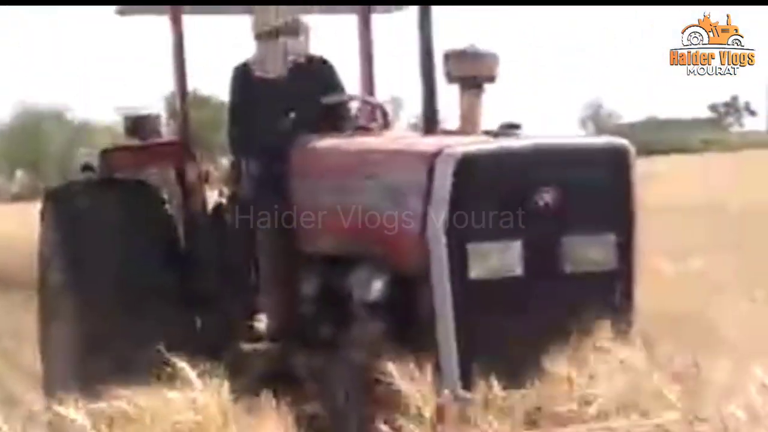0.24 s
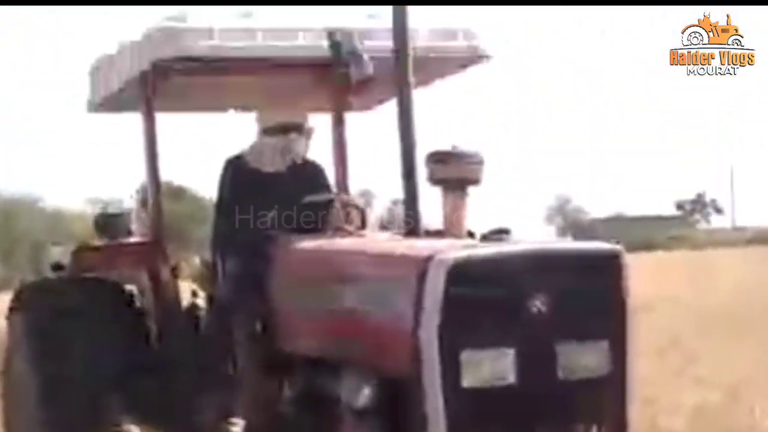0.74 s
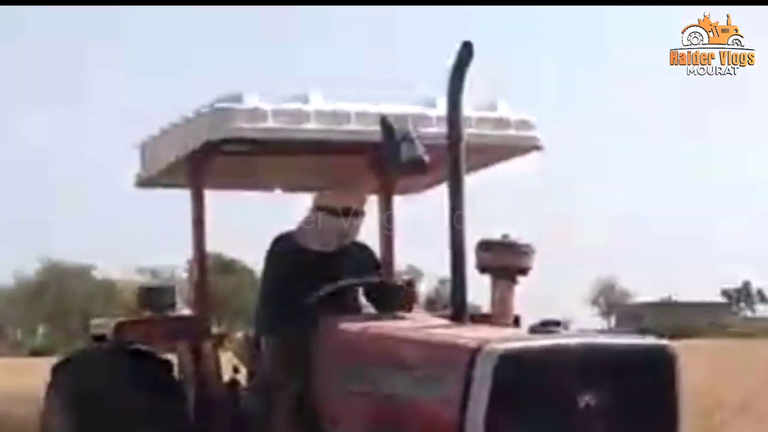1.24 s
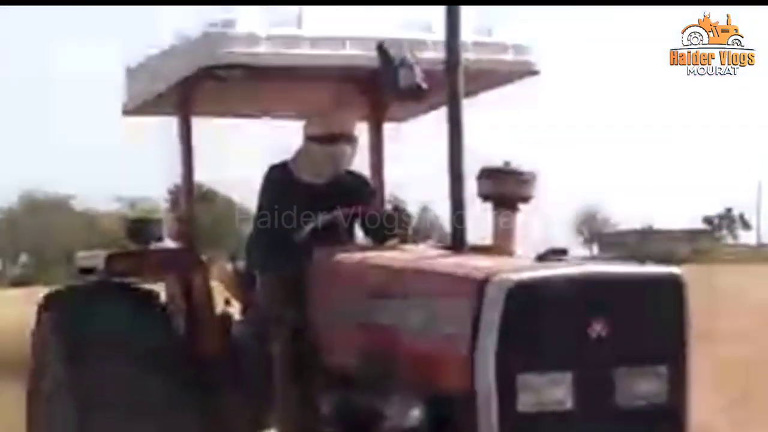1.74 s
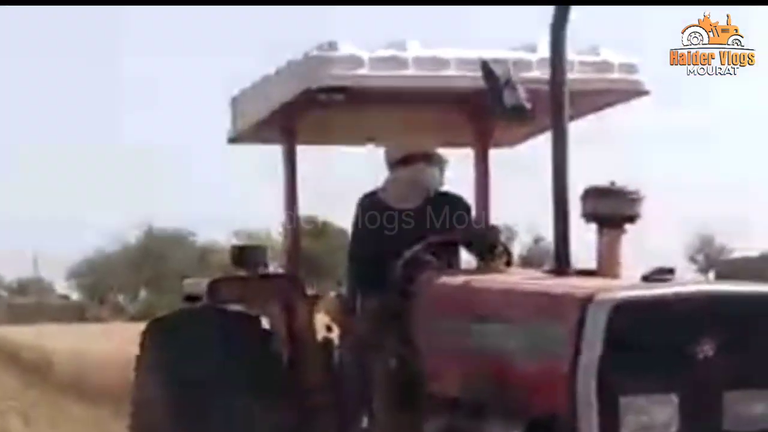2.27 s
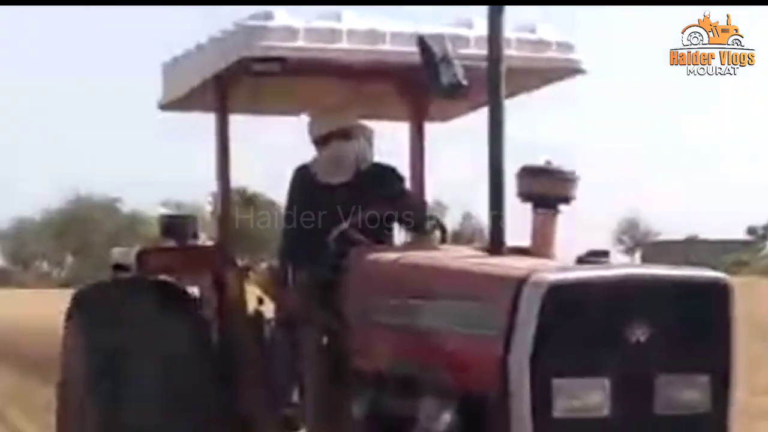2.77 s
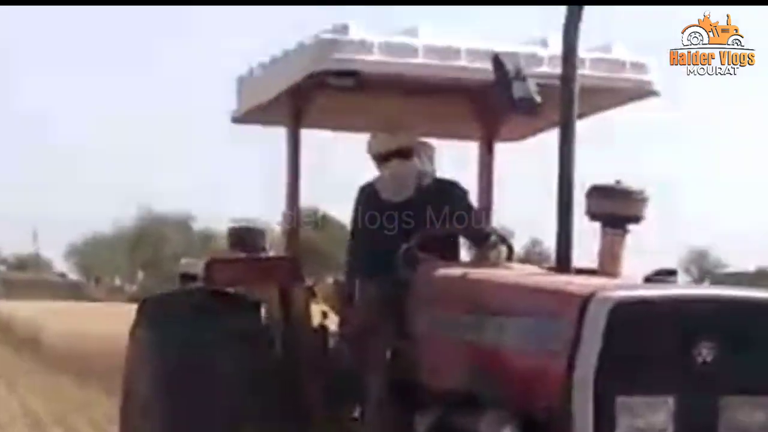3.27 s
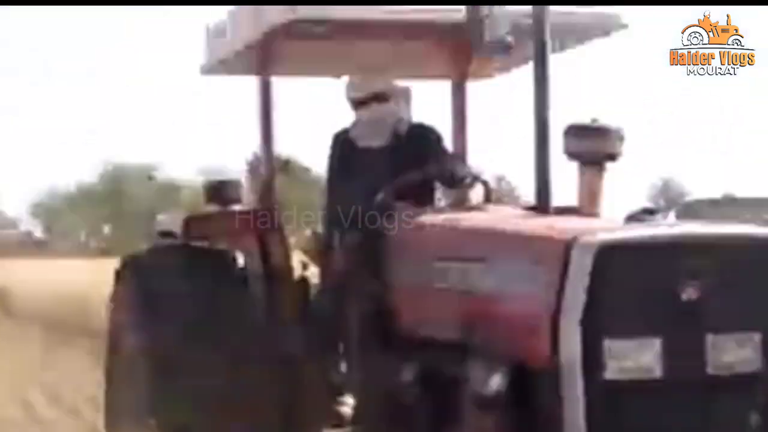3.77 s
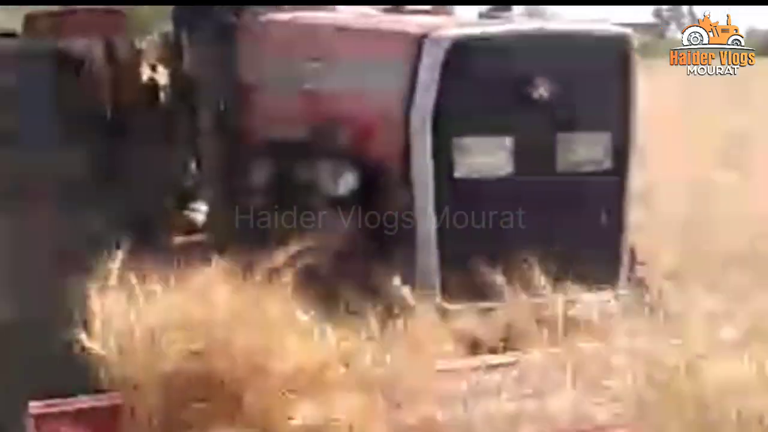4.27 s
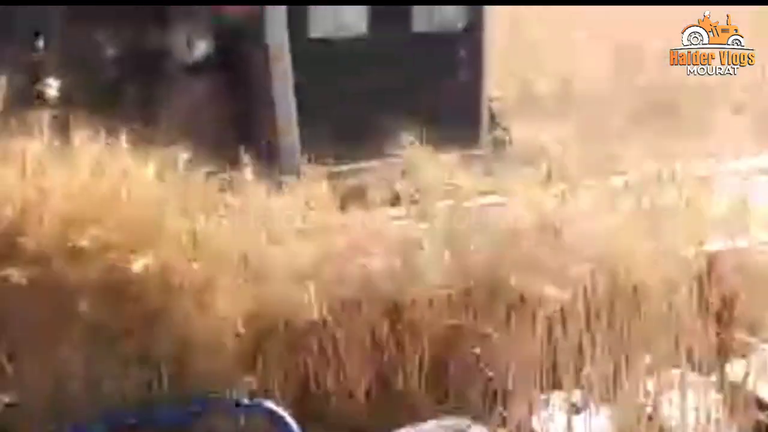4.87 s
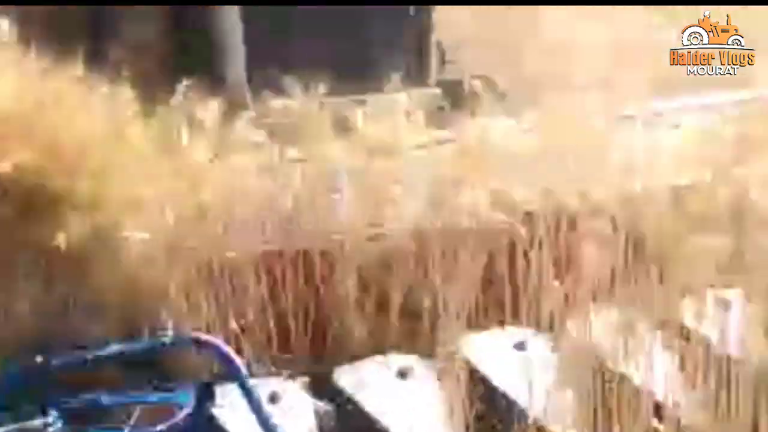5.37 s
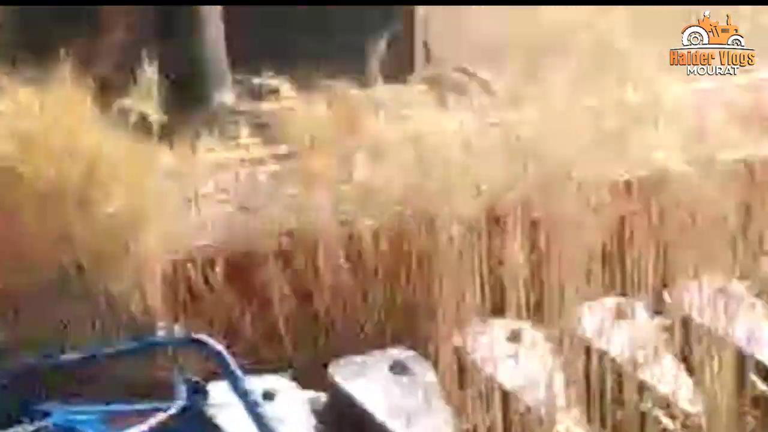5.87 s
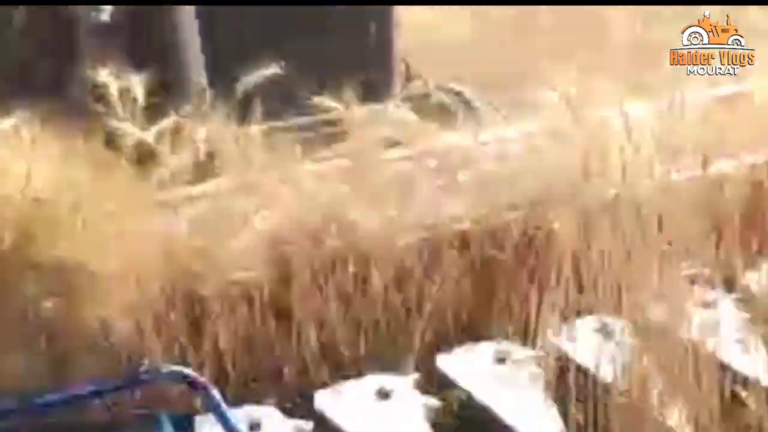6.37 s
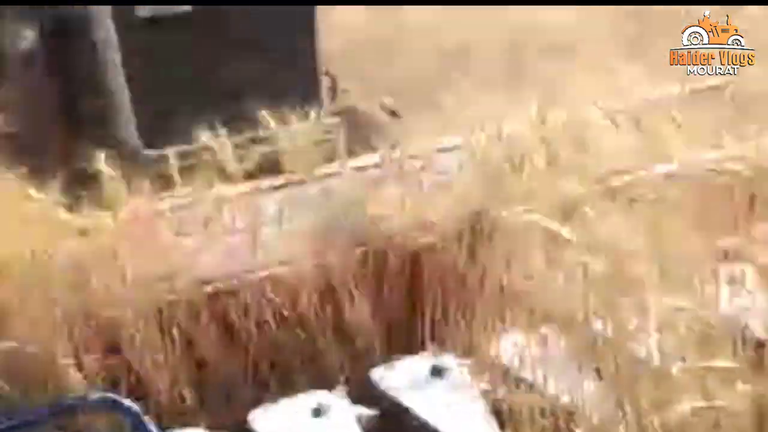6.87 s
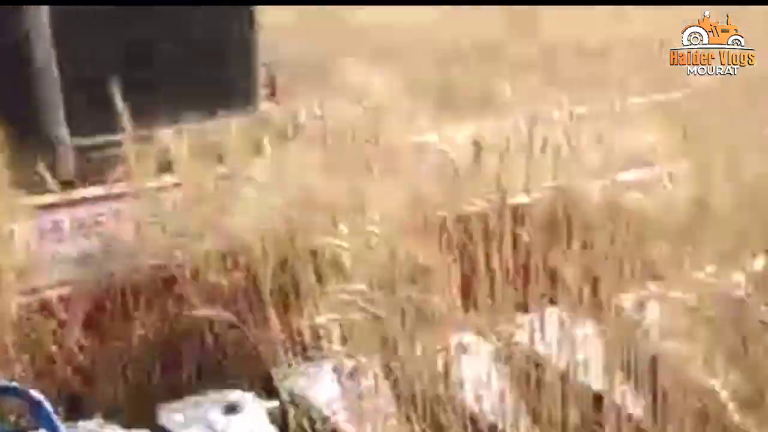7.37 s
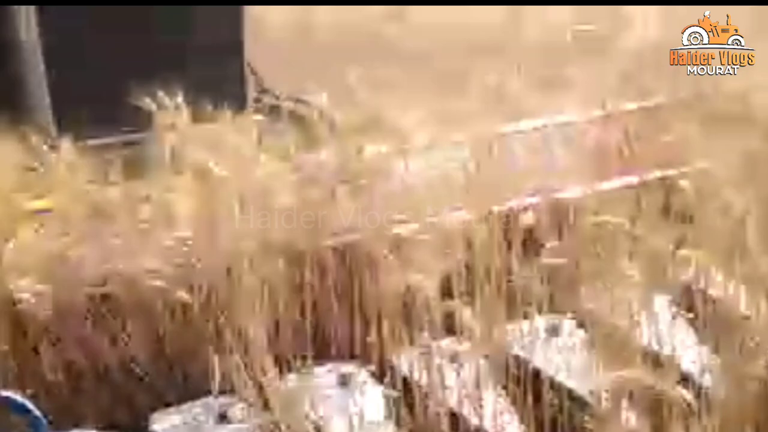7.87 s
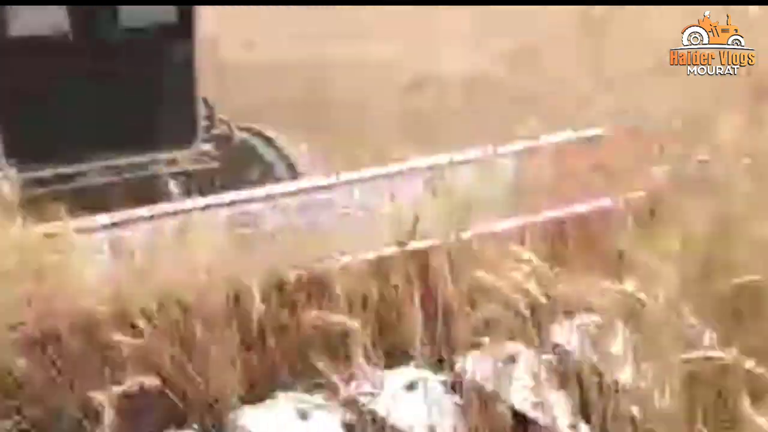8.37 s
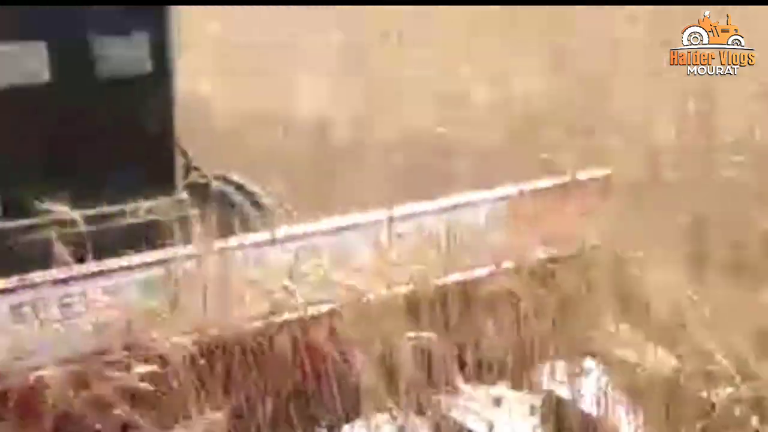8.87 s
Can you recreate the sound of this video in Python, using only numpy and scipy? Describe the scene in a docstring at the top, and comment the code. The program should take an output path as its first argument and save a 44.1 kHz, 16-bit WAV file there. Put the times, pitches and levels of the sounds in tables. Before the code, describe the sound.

Loose chains, guards and frame chatter steadily beside a diesel engine while a reciprocating blade shears crisp straw, growing closer and louder over the engine.

```python
"""Straw crackles and steel rattles a few steps away as a diesel tractor pushes a reaper through standing wheat.
A crank throws the knife to and fro: it knocks at its reversals and shears straw in between.
Random impacts and noise ring through resonances for chains, guards, frame and exhaust; sines make the clinks.
The engine's clatter fades as the hand-held mono phone nears the cutter bar; its noise suppression flickers."""
import sys
import numpy as np
from scipy import signal
from scipy.fft import rfft, irfft
from scipy.io import wavfile
from scipy.ndimage import uniform_filter1d

SR = 44100
rng = np.random.default_rng(int(sys.argv[2]) if len(sys.argv) > 2 else 0)


def inscribe(sig):
    """Save sig as 16-bit PCM at rate SR to the path in sys.argv[1].

    A 1-D sig is mono; a 2-D sig holds one channel per row.
    Samples are clipped to [-1, 1] before scaling.
    """
    pcm = np.round(np.clip(np.atleast_2d(sig).T, -1, 1) * 32767)
    wavfile.write(sys.argv[1], SR, pcm.astype(np.int16))


N = 401751  # length in samples

# Low rumble spectrum. Each row: frequency in Hz, level in dB per Hz.
RUMBLE = [(20, -26), (45, -14), (65, -5), (100, 2.5), (160, 3), (230, 3), (290, -16), (500, -16),
          (1000, -25)]
# Exhaust and silencer resonances. Each row: centre in Hz, width in Hz, level in dB.
EXHAUST = [(375, 53, -9), (447.5, 97, 1), (510, 148, 1), (565.6, 70, 0.5), (633, 53, -6)]
# The exhaust note swells or sinks. Each row: middle in seconds, length in seconds, change in dB.
EXHAUST_SWELLS = [(.08, .25, -3), (1.42, 0.18, 3), (2.85, .25, 2), (3.6, 0.45, -1), (4.87, 0.058, -7),
                  (5.8, 0.059, -5.5), (7.55, 0.27, -2.5), (8.5, 0.071, -4.5), (8.85, 0.078, -4)]
# A hollow drone above the exhaust, in patches. Each row: middle in seconds, length in seconds, rms level in dB.
DRONES = [(2.03, .25, -36.5), (2.77, .3, -34.5), (4.35, .25, -40), (5.45, 0.11, -45), (5.7, 0.13, -39),
          (6.0, .1, -44), (7.27, .13, -39.5), (7.5, 0.17, -38.5), (7.8, 0.35, -43), (8.13, 0.18, -42)]
# Engine firing tone. Each row: multiple of the firing rate, rms level in dB.
FIRING = [(1, -64.5), (2, -68)]
FIRING_HZ = 45.57  # mean firing rate
# Engine block spectrum. Each row: frequency in Hz, level in dB per Hz.
BLOCK = [(220, -35), (340, -5), (600, -10.5), (720, -0.5), (900, 4.5), (1300, 3.5), (1550, 2.5), (2100, 2),
         (2600, -8), (3500, 8.5), (3950, -3.5), (4400, -25), (6000, -15.5), (12000, -47)]
# The engine's clatter comes through more clearly. Each row: middle in seconds, length in seconds, change in dB.
CLEARINGS = [(2.2, 2.2, 2), (4.45, 0.77, 2.5), (8.14, 0.23, 11), (8.41, 0.078, 11.5), (8.95, 0.33, 9)]

# Soft low bumps on the phone. Each row: time in seconds (10 ms after onset), peak in dB, pitch in Hz.
BUMPS = [(0.049, -35, 196), (0.3, -36.5, 231), (.48, -40, 235), (0.753, -36.5, 244), (0.959, -35, 198),
         (1.297, -28.5, 174), (1.335, -36, 200), (2.149, -32, 231), (5.836, -31.5, 150),
         (6.989, -38.5, 214), (7.62, -42, 169), (8.135, -40, 182)]

# Dry ears of wheat, spectrum. Each row: frequency in Hz, level in dB per Hz.
EARS = [(6000, -30), (10000, 8), (12500, 2), (14000, -3.5), (16000, -9)]
# The hiss of the ears swells or sinks. Each row: middle in seconds, length in seconds, change in dB.
RUSTLES = [(1.58, 0.18, 5), (2.27, .2, -1), (3.4, 0.41, -10), (5.74, 0.1, 7), (6.1, 0.11, 0),
           (6.75, .6, 2.5), (8.35, 0.2, 6)]
# Snapping straw spectrum. Each row: frequency in Hz, level in dB per Hz.
STRAW = [(2000, -20), (4000, -31), (5400, -4.5), (5900, 3), (6600, 2), (7800, 4), (9000, 2), (10300, -4.5),
         (11200, -9.5), (11600, -23.5), (12500, -48), (14500, -22)]
# The knife's two passes through the straw.
# Each row: start in the turn from 0 to 1, dying length in turns, relative level in dB.
CUTS = [(.215, 0.032, 3), (.715, 0.064, -1.5)]
# Stalks squeaking along the guides. Each row: middle in seconds, length in seconds, level in dB.
SQUEAKS = [(1.67, 0.051, -24), (2.6, 0.07, -35), (4.87, 0.11, -32), (5.2, 0.055, -31), (5.33, 0.07, -27),
           (7.07, 0.072, -40), (7.36, 0.047, -36), (7.64, 0.25, -34), (7.78, 0.08, -33), (8.48, 0.1, -31)]
# Thick tufts going through the knife. Each row: middle in seconds, length in seconds, level in dB.
TUFTS = [(5.2, 0.063, -37), (6.19, .05, -31), (5.49, 0.09, -27), (5.82, 0.12, -24.5), (6.43, 0.067, -26.5),
         (7.07, 0.069, -27.5), (7.46, 0.09, -39), (7.59, 0.072, -35), (7.75, 0.11, -27), (8.27, 0.048, -33),
         (8.39, 0.06, -26.5), (8.47, 0.056, -23), (8.89, 0.076, -28.5)]
# Breaking tuft spectrum. Each row: frequency in Hz, level in dB per Hz.
TUFT = [(600, -32), (1400, -16), (1700, -1.5), (2400, 4), (3200, 6.5), (3900, 0), (4400, -26), (4900, 5),
        (5400, -12), (5900, -25), (7500, -38), (12000, -44)]
# Stiff stalks crunching between knife and guard.
# Each row: start in seconds, level in dB before trim, dying time in seconds.
CRUNCHES = [(.064, -19, .012), (.357, -14.5, .014), (.506, -20, .009), (.523, -16, .022), (.585, -14, .014),
            (.645, -16, .014), (.769, -17, .009), (.788, -15.5, .02), (1.23, -21, .011), (2.403, -20, .008),
            (2.69, -18.5, .009), (3.274, -22, 0.016), (3.851, -23, .011), (4.585, -17, .012),
            (5.015, -18, .01), (5.109, -20, .012), (5.176, -20, .011), (5.349, -26, .01),
            (5.957, -22, .012), (6.04, -24, .009), (6.101, -17, .012), (6.415, -16, .011),
            (6.478, -18, .014), (6.535, -16.5, .01), (6.683, -18, .008), (7.052, -17.5, .011),
            (7.287, -20, 0.01), (7.34, -19, .024), (7.483, -18.5, .018), (7.552, -20, 0.011),
            (7.775, -23, .018), (8.284, -22, 0.025), (9.017, -21, .009), (9.091, -23, .012)]
# Crunch spectrum. Each row: frequency in Hz, level in dB per Hz.
CRUNCH = [(1200, -32), (2800, -11), (3500, 5.5), (4000, 1.5), (4400, -4), (4900, -2), (5400, -4.5),
          (5900, -23), (7200, -10), (12000, -45)]

# Loose steel parts, struck and ringing. Each row: start in seconds, level in dB before trim, pitch in Hz.
CLINKS = [(.342, -18, 3420), (.984, -13, 2130), (3.195, -16, 1820), (3.414, -14, 3140), (4.285, -21, 3230),
          (4.369, -17, 3220), (4.873, -15, 3120), (5.176, -16, 3430), (5.446, -13, 3400),
          (5.739, -16, 3250), (6.031, -17, 3230), (6.187, -17, 2500), (6.323, -16, 3210),
          (7.449, -15.5, 1750), (7.775, -15, 3170), (8.347, -16, 3230), (8.415, -21, 1650),
          (8.837, -12.5, 2800), (8.876, -17, 2490)]
# The hardest clanks of knife drive and binder.
# Each row: start in seconds, level in dB before trim, relative brightness in dB.
CLANKS = [(0.3541, -16, -8), (0.523, -20, -2), (1.4481, -15, -18), (1.9609, -18, -8), (2.1735, -18, -15),
          (2.4039, -18, -1), (3.4136, -13.5, -7), (4.58, -20, -16), (5.014, -19, -16), (5.4455, -16, -18),
          (5.8052, -19, -11), (6.0302, -21, -19), (6.3225, -15.5, -15), (6.469, -19, -12),
          (7.054, -20, -10), (7.3397, -21.5, -12), (7.5517, -21, -8), (7.7742, -19.5, -13),
          (8.8363, -14.5, -19)]
# Steel frame of the reaper. Each row: centre in Hz, width in Hz, level in dB.
FRAME = [(871, 118, -7.5), (1104, 155, -6.5), (1312, 118, -7), (1637, 460, -3.5), (1978, 240, -6),
         (2230, 400, -2), (2438, 142, -1.5), (2827, 560, 0.5), (3167, 310, 3.5), (3452, 260, 1.5),
         (3702, 310, -2)]
# The frame shakes harder or eases. Each row: middle in seconds, length in seconds, change in dB.
SHUDDERS = [(3.5, 1, 1.5), (4.88, 0.57, 0.5), (5.47, 0.16, 1), (7.96, 0.044, -2.5), (8.7, 0.24, -0.5)]
# Knife guards and fingers. Each row: centre in Hz, width in Hz, level in dB.
GUARDS = [(4190, 190, -3.5), (4694, 500, 1), (4960, 770, -2.5), (5426, 240, -2), (6370, 100, -9.5),
          (6890, 310, -11), (7630, 420, -10), (9000, 160, -35), (9600, 200, -43), (10820, 890, -12),
          (11990, 400, -17)]
# Knife scraping in its guards, spectrum. Each row: frequency in Hz, level in dB per Hz.
SCRAPE = [(1500, -30), (3000, -13), (4000, 6), (4700, -3), (5400, -1.5), (6200, -18), (8000, -7.5),
          (12000, -31)]
# Knife crank speed. Each row: time in seconds, turns per second in Hz.
CRANK = [(0.0, 6.847), (1.5, 6.852), (3.0, 6.893), (4.5, 6.881), (6.0, 6.867), (7.5, 6.893), (9.11, 6.839)]
# Knocks and lingering rattles in each crank turn.
# Each row: mean place in the turn from 0 to 1, mean level in dB, dying time in seconds.
STROKE = [(0.425, 2, 0.017), (0.6, -3, 0.021), (0.9, 1, 0.01), (0.05, -2.5, 0.012)]
# The knife is loud with the phone pointing down at it, faint with the phone pointing up at the cab.
# Each row: time in seconds, level of the knife in dB.
KNIFE = [(0, -25), (0.55, -27.5), (1.2, -30), (1.5, -29), (2.25, -38), (2.7, -33), (3.0, -34.5),
         (3.35, -30), (3.7, -29.5), (4.03, -37), (4.42, -33), (4.65, -26.5), (6.2, -28), (6.9, -27),
         (7.5, -25.5), (8.0, -25), (8.35, -22.5), (8.7, -29.5), (9.11, -27)]
KNIFE_FULL_DB = -24.5  # KNIFE level with the phone pointing at the knife
GUARD_DB = -26.5  # ring of the guards with the phone pointing at them
# change in dB per dB of the knife; the ears' hiss rises as the phone is held up
GUARD_PER_AIM, FRAME_PER_AIM, CHAFF_PER_AIM = 0.91, 0.14, -0.4
# share of plain scraping at first, when it stops falling in seconds, and the share left to the end
SCRAPE_SHARE, SCRAPE_ENDS_S, SCRAPE_LEFT = 0.7, 2.3, 0.0059

# Steady fades as the phone nears the cutter bar, before passing swells and aim.
# Each holds: level at first in dB, start of the fade in seconds, slope in dB per second.
EXHAUST_FADE = (-30, 2.8, -0.36)
CLATTER_FADE = (-24.5, 2.6, -2.1)
FRAME_FADE = (-19, 5.25, -0.44)
STRAW_FADE = (-29, 3.83, -2.7)
CHAFF_FADE = (-41.5, 1.7, -0.35)
# Bands that the phone's noise suppression thins, leaving a hollow, wavering tone.
# Each row: mean centre in Hz, width setting in Hz, depth in dB before wavering, start in seconds, end in seconds.
# A band fades in ahead of its start and out after its end.
HOLLOWS = [(338, 127, -7, 6.9, 8.5), (735, 150, -3, 2.7, 15), (740, 154, -2, 8.8, 10),
           (1190, 96, -2, 2.9, 6.6), (1460, 164, -9.5, 7.5, 9.8), (1507, 220, -3, 5.1, 3.6),
           (990, 90, -2.5, 6, 9.6), (2435, 190, -6, 3.9, 8.3), (3060, 96, -3, 3, 9.2),
           (4160, 160, -3, 2.4, 10), (4430, 170, -7.5, 3.4, 10), (5070, 130, -11, 2.4, 4.2),
           (5546, 210, -8.5, 3.5, 10), (6030, 440, -10, 4.8, 10), (5930, 440, -5, 4.2, 3.5),
           (6200, 310, -3, 10.2, 17), (9030, 900, -9, 7.1, 8.6)]
TOP_HZ = 15750  # the phone passes sound up to here


def undb(db):
    """Decibels to gain."""
    return 10 ** (np.asarray(db) / 20)


def unit(x):
    """Scale to rms 1."""
    return x / np.sqrt(np.mean(x ** 2))


def steady(x, window_s):
    """Even out the strength of a sound over a short time; rms near 1."""
    power = np.abs(uniform_filter1d(x * x, int(window_s * SR) + 1))
    return x / np.sqrt(power + 1e-12)


def curves(table):
    """Draw each column of a timed table as a curve, one value a sample."""
    s, *columns = np.transpose(table)
    return [np.interp(np.arange(N) / SR, s, column) for column in columns]


def fade(level_db, from_s, db_per_s):
    """A level in dB that holds, then changes steadily."""
    return level_db + db_per_s * np.maximum(np.arange(N) / SR - from_s, 0)


def swells(table):
    """Smooth passing rises and dips in dB; a length is measured at half height."""
    t = np.arange(N) / SR
    return sum(db * .5 ** ((2 * (t - s) / length) ** 2) for s, length, db in table)


def bursts(table):
    """Gain of short rounded bursts; a length is measured at half power."""
    t = np.arange(N) / SR
    power = 0
    for s, length, db in table:
        away = np.minimum((2 * (t - s) / length) ** 2, 20)
        power = power + undb(db) ** 2 * np.exp2(-away)
    return np.sqrt(power)


def walk(rate):
    """Random wander with a new target `rate` times a second, slewed between targets; rms 1."""
    hold = int(SR / rate)
    steps = rng.standard_normal(4096)[np.arange(N) // hold % 4096]
    return unit(uniform_filter1d(steps, hold))


def causal(x, gain, size=4096):
    """Filter with the fastest-dying (minimum-phase) response for a given gain curve."""
    hz = np.maximum(np.fft.rfftfreq(size, 1 / SR), 1)
    cepstrum = irfft(np.log(gain(hz) + 1e-6))
    # folding the cepstrum forward in time makes the response minimum-phase
    cepstrum[1:size // 2] *= 2
    cepstrum[size // 2 + 1:] = 0
    response = irfft(np.exp(rfft(cepstrum)))
    return signal.oaconvolve(x, response / np.linalg.norm(response))[:N]


def colour(x, spectrum):
    """Shape a sound by (Hz, dB) points, keeping the power of white noise."""
    hz, db = np.transpose(spectrum)
    return causal(x, lambda f: undb(np.interp(np.log(f), np.log(hz), db)))


def ring(x, modes):
    """Ring a body of steep (Hz, width, dB) resonances, keeping the power of white noise."""
    def gain(f):
        power = 0
        for hz, width, db in modes:
            detune = (f * f - hz * hz) / (f * width)
            power = power + (undb(db) / (1 + detune ** 2)) ** 2
        return np.sqrt(power)

    return causal(x, gain)


def contacts(rate, spread_db):
    """Dense tiny impacts of uneven size, `rate` a second on average; rms 1."""
    hit = rng.random(N) < rate / SR
    sign = np.sign(rng.standard_normal(N))
    size = undb(spread_db * np.clip(rng.standard_normal(N), -2, 2))
    return unit(hit * sign * size)


def blows(times, gains, decay):
    """Power of the chatter after blows: each starts at once and dies away."""
    power, age = np.zeros(N), np.arange(SR // 8) / SR
    for s, gain in zip(times, gains):
        start = int(np.clip(s * SR, 0, N - 1))
        power[start:start + len(age)] += (gain * np.exp(-age[:N - start] / decay)) ** 2
    return power


def low_rumble(rumble_db=-54):
    """Low-pitched noise rumbles under the engine, its level wandering slowly."""
    return undb(rumble_db) * colour(rng.standard_normal(N), RUMBLE) * undb(1.04 * walk(6))


def engine(exhaust_db, clatter_db, puff_depth=0.33, knock_db=6, knock_turns=.2, even_s=0.158, lump_db=1.0):
    """Each firing puffs gas through the silencer and knocks the block; a hollow drone comes and goes."""
    cycle = np.cumsum(FIRING_HZ * (1 + 0.004 * walk(2.985))) / SR
    pulse = np.cos(2 * np.pi * cycle) * 0.26 + np.cos(4 * np.pi * cycle) * 0.52
    gas = unit(rng.standard_normal(N) * (1 + puff_depth * pulse))
    exhaust = steady(ring(gas, EXHAUST), even_s) * undb(exhaust_db + lump_db * walk(30))
    drone = ring(gas, [(750, 50, 0)]) * bursts(DRONES)

    # each knock starts at a firing and dies over a part of the cycle
    knock = np.sqrt(1 + undb(knock_db) ** 2 * np.exp(-(cycle % 1) / knock_turns))
    clatter = unit(contacts(rate=5000, spread_db=2.0) * knock)
    block = colour(clatter, BLOCK) * undb(clatter_db)
    tone = sum(undb(db) * np.sqrt(2) * np.sin(2 * np.pi * round(k) * cycle) for k, db in FIRING)
    return exhaust + drone + block + tone


def bumps(decay_s=0.025, width_hz=90):
    """Dull low bumps: dying noise rings one low resonance for a few uneven cycles each."""
    push, out = rng.standard_normal(N), 0
    for s, db, hz in BUMPS:
        bump = ring(push * np.sqrt(blows([s - .01], [1], decay_s)), [(hz, width_hz, 0)])
        out = out + undb(db) * bump / np.abs(bump).max()
    return out


def wheat(turns, straw_db, chaff_db, cut_db=3.0, bite_s=0.0046, patchy_db=1.0, swell_db=1.2, sway_db=2.5):
    """Stalks snap in two bursts a turn as the knife passes, over the rustle of the swept, swaying ears."""
    cutting = 0
    for place, length, db in CUTS:
        since = (turns - place) % 1
        cutting = cutting + undb(db + cut_db) ** 2 * np.exp(-since / length)
    cutting = uniform_filter1d(cutting, int(bite_s * SR) + 1)
    # the crop stands unevenly, so some strokes bite more stalks than others
    stand = undb(1.6 * walk(12))
    unevenness = undb(patchy_db * walk(40) + swell_db * walk(3.4))
    flow = unit(np.sqrt(1 + cutting * stand) * unevenness)
    stalks = colour(contacts(rate=10000, spread_db=3.5) * flow, STRAW) * undb(straw_db)
    chaff = colour(rng.standard_normal(N) * flow, EARS) * undb(chaff_db + sway_db * walk(8.2))
    return stalks + chaff


def squeaks(squeak_hz=4230, width_hz=230, slip_db=4.5, slip_rate=60):
    """Dry stalks stick and slip along the steel guides with a thin, stuttering rasp."""
    slips = contacts(rate=2300, spread_db=8.5) * undb(slip_db * walk(slip_rate))
    return ring(unit(slips), [(squeak_hz, width_hz, 0)]) * bursts(SQUEAKS)


def tufts(clump_db=14.0, clump_rate=60, clump_s=0.0098):
    """A thick tuft meets the knife and breaks in sudden, coarse clumps of loud snaps."""
    when, size = rng.random((int(clump_rate * N / SR), 2)).T
    clumps = np.sqrt(1 + blows(when * N / SR, undb(clump_db * size), clump_s))
    snaps = unit(contacts(rate=1400, spread_db=4.5) * clumps)
    return colour(snaps, TUFT) * bursts(TUFTS)


def crunches(crunch_db=-.5):
    """A stiff stalk gives way at once, and its fibres go on cracking for a moment."""
    power = sum(blows([s], [undb(db + crunch_db)], decay) for s, db, decay in CRUNCHES)
    return colour(contacts(rate=6000, spread_db=2.5) * np.sqrt(power), CRUNCH)


def slaps(slap_db=-21.5, rate=38, decay_s=0.0041, spread_db=9, slap_hz=2200, width_hz=1200):
    """The conveyor chain slaps against its rails at random: each slap is sudden, dry and short."""
    when, size = rng.random((int(rate * N / SR), 2)).T
    power = blows(when * N / SR, undb(slap_db - spread_db * size), decay_s)
    return ring(contacts(rate=9000, spread_db=1.0) * np.sqrt(power), [(slap_hz, width_hz, 0)])


def clinks(clink_db=-1.5, decay_s=0.012, split=.07, partner_db=-5):
    """Each struck loose part rings briefly in a close pair of modes."""
    out, age = np.zeros(N + SR), np.arange(SR // 8) / SR
    for (s, db, hz), chance in zip(CLINKS, rng.uniform(-1.06, 1, len(CLINKS))):
        partner_hz = hz * (1 + split * chance)
        pair = np.sin(2 * np.pi * hz * age) + undb(partner_db) * np.sin(2 * np.pi * partner_hz * age)
        start = int(s * SR)
        out[start:start + len(age)] += undb(db + clink_db) * np.exp(-age / decay_s) * pair
    return out[:N]


def clanks(body_db=2.0, guard_db=-1, edge_db=-2.0, decay_s=0.0047, crack_db=-8.5, crack_s=.004):
    """A hard first contact, then a dying burst of rebounds through frame and guards, with a bright steel edge."""
    s, db, bright_db = np.transpose(CLANKS)

    def strike(level_db):
        power = blows(s, undb(level_db), decay_s) + blows(s, undb(level_db + crack_db), crack_s)
        return contacts(rate=7500, spread_db=7.0) * np.sqrt(power)

    guards = ring(strike(db + bright_db), GUARDS)
    edge = ring(strike(db + bright_db), [(6300, 830, 0)])
    body = ring(strike(db), FRAME)
    return undb(body_db) * body + undb(guard_db) * guards + undb(edge_db) * edge


def jingle(rate=260, decay_s=0.016, spread_db=11.5):
    """Chain links and tines ping briefly, each at its own pitch; rms 1."""
    out, age = np.zeros(N + SR), np.arange(SR // 8) / SR
    for when, pitch, size in rng.random((int(rate * N / SR), 3)):
        start, hz = int(when * N), 1200 * 8 ** pitch
        ping = np.exp(-age / decay_s) * np.sin(2 * np.pi * hz * age)
        out[start:start + len(age)] += undb(spread_db * size) * ping
    return unit(out[:N])


def chatter(modes, shake, wander_db, jolt_db, jolt_rate=30, jolt_s=0.0097, count=4):
    """Several loose parts, each with its share of the modes, are jolted at random and settle again."""
    out = 0
    for k in range(count):
        own = modes[k::count]
        power = sum(width * undb(db) ** 2 for _, width, db in own)
        when, size = rng.random((int(jolt_rate * N / SR), 2)).T
        jolts = np.sqrt(1 + blows(when * N / SR, undb(jolt_db) * size, jolt_s))
        drive = contacts(rate=3000, spread_db=3.0) * shake * jolts * undb(wander_db * walk(11.0))
        out = out + np.sqrt(power) * ring(drive, own)
    return unit(out)


def knife_knocks(turns, scatter_db=1.0, slack_s=0.0008):
    """Play in the drive is taken up with knocks near the same places of every crank turn."""
    count = int(turns[-1]) + 1
    power = 0
    for place, db, decay in STROKE:
        chance = rng.standard_normal((80, 2))[:count]
        times = np.interp(np.arange(count) + place, turns, np.arange(N) / SR)
        times = times + slack_s * chance[:, 0]
        power = power + blows(times, undb(db + scatter_db * chance[:, 1]), decay)
    return power


def reaper(turns, frame_db, guard_db, scraping, jingle_db=-6.0, scrape_db=4):
    """Chains and loose steel chatter all the time, harder after each knock; the knife scrapes in its guards."""
    shake = unit(np.sqrt(1 + knife_knocks(turns)))

    def rattle(modes, wander_db, jolt_db):
        loose = chatter(modes, shake, wander_db, jolt_db)
        return unit(loose + undb(jingle_db) * unit(ring(jingle(), modes)))

    frame = rattle(FRAME, wander_db=0.98, jolt_db=3.5)
    guards = rattle(GUARDS, wander_db=2.5, jolt_db=8.5)
    scrape = colour(contacts(rate=7400, spread_db=-3.5) * shake, SCRAPE) * undb(scrape_db)
    # plain scraping gives way to ringing guards
    share = np.clip(scraping, 0, 1)
    knife = np.sqrt(1 - share) * guards + np.sqrt(share) * scrape
    return frame * undb(frame_db) + knife * undb(guard_db)


def hollow(x, fade_s=2.87, waver=0.57, waver_rate=10, drift=0.0056, drift_rate=3, size=1024):
    """Noise suppression thins some bands, which waver and slide a little in pitch: a shifting, hollow tone."""
    f, t, spectra = signal.stft(x, SR, nperseg=size)
    frames = np.minimum(t * SR, N - 1).astype(int)
    gain = np.ones(spectra.shape)
    for hz, width, db, start, end in HOLLOWS:
        # where the end precedes the start, the band sinks only in part or not at all
        presence = np.clip(1 + (t - start) / fade_s, 0, 1) * np.clip(1 + end - t, 0, 1)
        depth = presence * np.maximum(1 + waver * walk(waver_rate)[frames], 0)
        centre = hz * (1 + drift * walk(drift_rate)[frames])
        away = np.square((f[:, None] - centre) / (0.67 * width))
        gain *= 1 - (1 - undb(db * depth)) * np.exp(-np.minimum(away * away, 20))
    return signal.istft(spectra * gain, SR, nperseg=size)[1][:N]


def suppress(x, threshold_db=-6.0, strength=0.65, above_hz=640, size=1024, count=25):
    """Noise suppression: spots much weaker than the pitches around them sink, so the valleys gape and flicker."""
    f, _, spectra = signal.stft(x, SR, nperseg=size)
    power = uniform_filter1d(np.abs(spectra) ** 2, size=3, axis=0)  # smooth over pitch
    power = uniform_filter1d(power, size=7, axis=1) + 1e-18  # smooth over time
    around = uniform_filter1d(power, size=count, axis=0)
    threshold = undb(threshold_db) ** 2
    gain = ((1 + threshold) * power / (power + threshold * np.abs(around))) ** strength
    gain = np.where(f[:, None] > above_hz, gain, 1)
    return signal.istft(spectra * gain, SR, nperseg=size)[1][:N]


def scene():
    """Tractor, reaper and crop in the open field, the same in both channels."""
    turns = np.cumsum(curves(CRANK)[0]) / SR
    aim_db = curves(KNIFE)[0] - KNIFE_FULL_DB
    scraping = np.interp(np.arange(N) / SR, [0, SCRAPE_ENDS_S], [SCRAPE_SHARE, SCRAPE_LEFT])

    exhaust_db = fade(*EXHAUST_FADE) + swells(EXHAUST_SWELLS)
    clatter_db = fade(*CLATTER_FADE) + swells(CLEARINGS)
    chaff_db = fade(*CHAFF_FADE) + CHAFF_PER_AIM * aim_db + swells(RUSTLES)
    frame_db = fade(*FRAME_FADE) + FRAME_PER_AIM * aim_db + swells(SHUDDERS)
    guard_db = GUARD_DB + GUARD_PER_AIM * aim_db

    tractor = low_rumble() + engine(exhaust_db, clatter_db)
    crop = wheat(turns, fade(*STRAW_FADE), chaff_db)
    cutter = reaper(turns, frame_db, guard_db, scraping) + slaps() + clanks()
    close = bumps() + squeaks() + tufts() + crunches() + clinks()  # untouched by the hollow bands
    mono = hollow(tractor + crop + cutter) + close
    return np.array([mono, mono])


def record(dry):
    """The mono phone suppresses weak noise and cuts the top."""
    top_cut = signal.ellip(10, .2, 80, TOP_HZ, fs=SR, output="sos")
    mono = signal.sosfilt(top_cut, suppress(dry[0]))
    return np.array([mono, mono])


dry = scene()
out = record(dry)
inscribe(out)
```